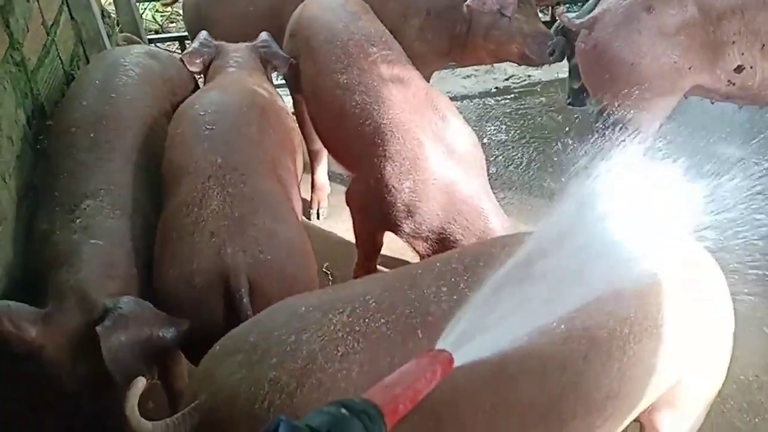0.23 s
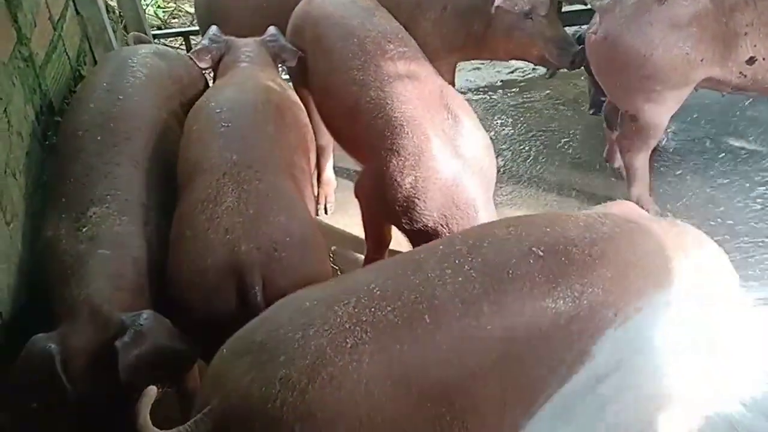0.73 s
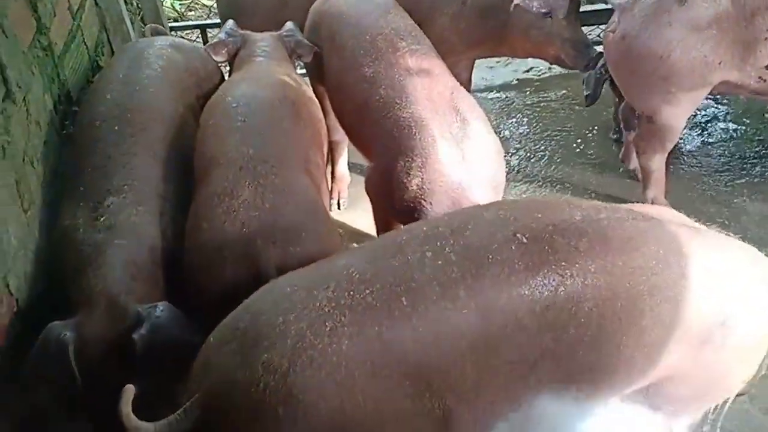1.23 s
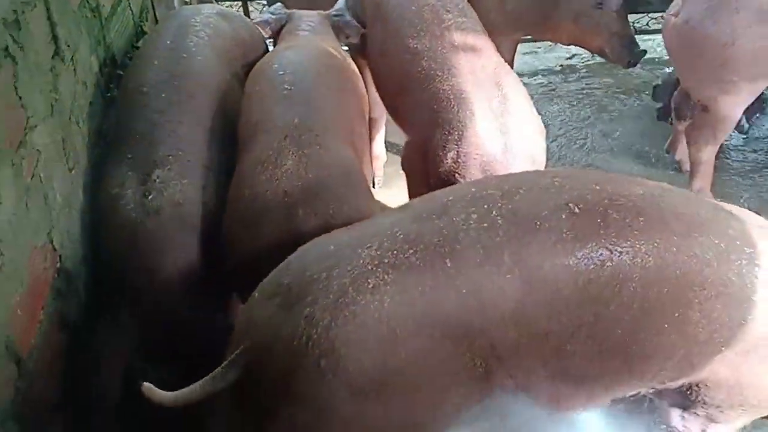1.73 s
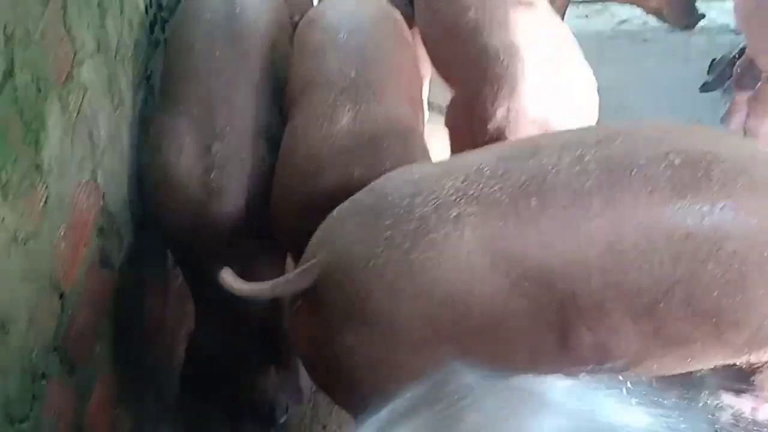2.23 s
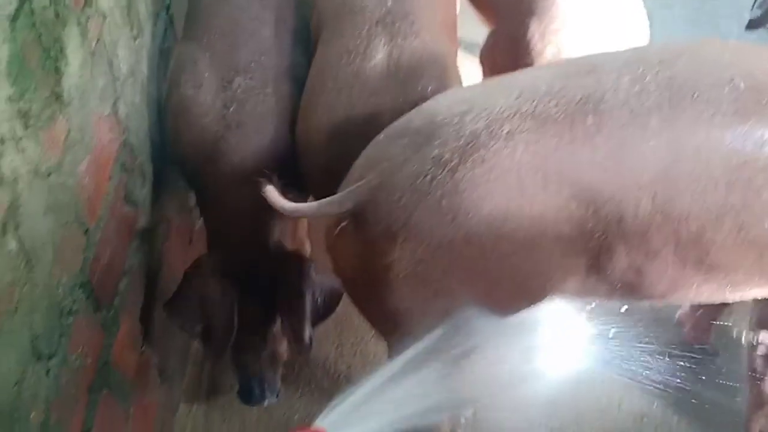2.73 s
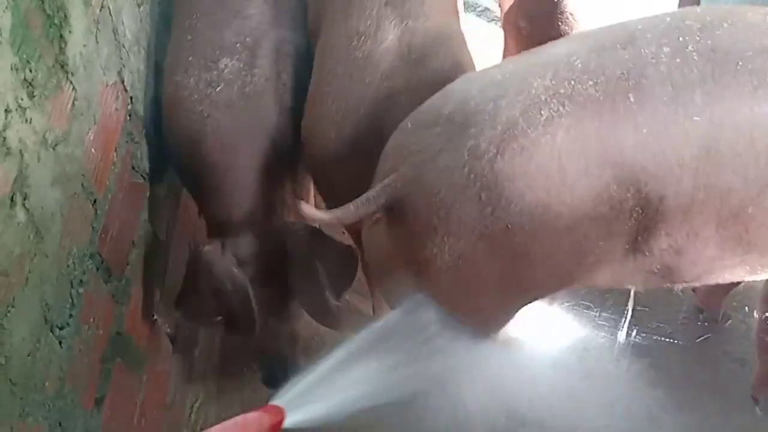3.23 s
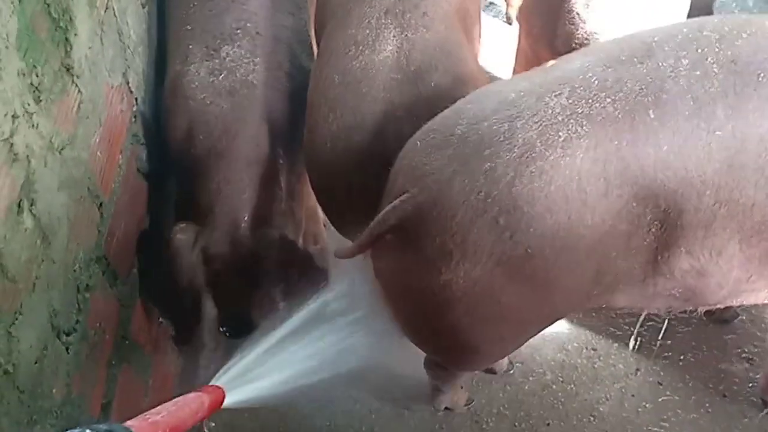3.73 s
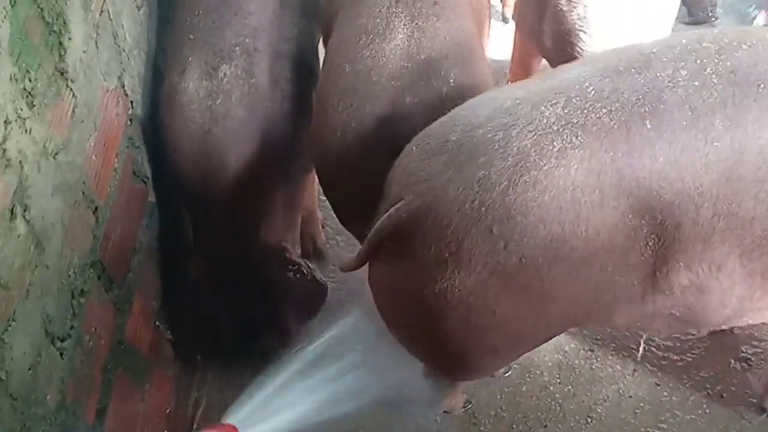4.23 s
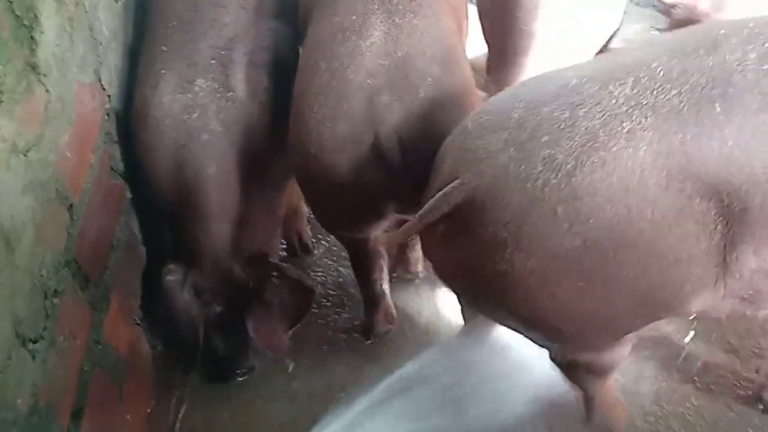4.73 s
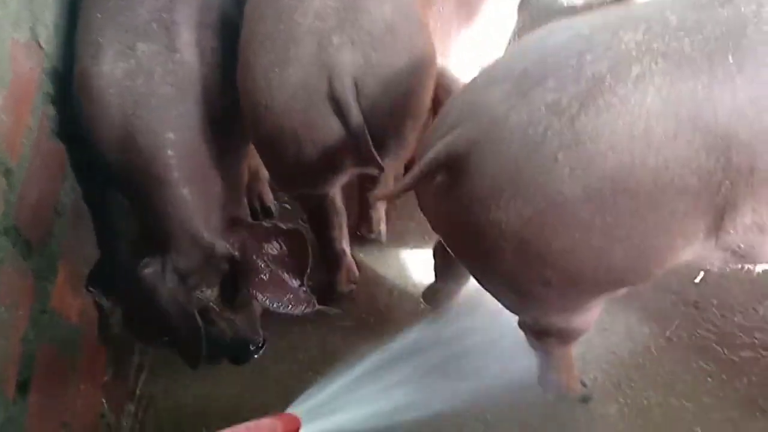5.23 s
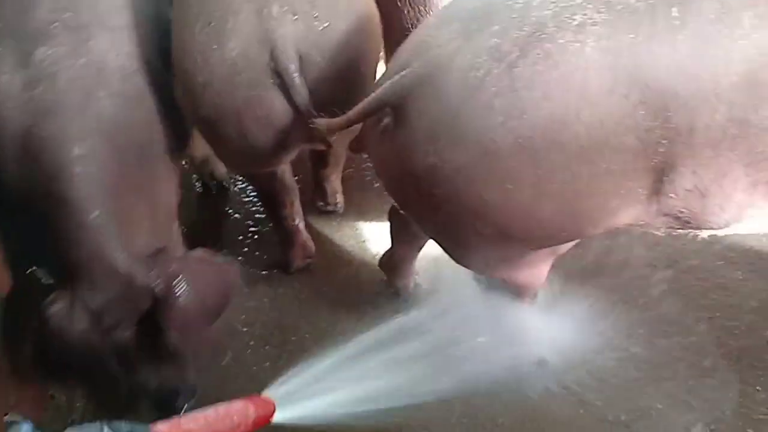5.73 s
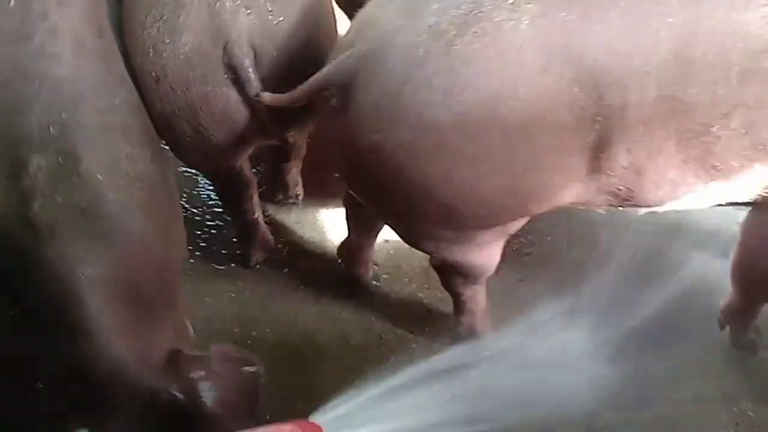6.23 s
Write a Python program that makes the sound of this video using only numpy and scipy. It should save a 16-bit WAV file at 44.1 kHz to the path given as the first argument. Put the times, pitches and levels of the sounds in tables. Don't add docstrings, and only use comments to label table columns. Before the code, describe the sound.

A hose sprays pigs in a walled pen, heard very close on a small handheld microphone. Continuous bright hiss and spatter mix with hollow drumming on bodies. Big drops smack the microphone on one side, and soft hooves thud. Around three seconds the jet surges, then stutters rapidly and drops back while a low distant engine hums. Loud slaps close it.

```python
import sys
import numpy as np
from scipy import signal
from scipy.fft import rfft, irfft, dct
from scipy.io import wavfile
from scipy.ndimage import uniform_filter1d

SR = 44100
rng = np.random.default_rng(int(sys.argv[2]) if len(sys.argv) > 2 else 0)


def to_linear_factor(level_db):
    exponent = np.asarray(level_db, float) / 20
    return 10 ** exponent


def generate_wav(sig):
    pcm = np.round(np.clip(np.atleast_2d(sig).T, -1, 1) * 32767).astype(np.int16)
    wavfile.write(sys.argv[1], SR, pcm)


N = 286650
HZ = np.fft.rfftfreq(N, 1 / SR) + 1

# [t/s, level/dB over usual]
JET_FORCE = [(0, -7.5), (.75, -4.5), (1.08, 2.5), (1.3, -1.5), (2.0, -1), (2.28, 1.5), (2.7, 0.5),
             (3.1, 1.5), (3.33, 9.5), (3.65, 4), (3.92, -6.5), (4.3, -2), (4.8, -0.5), (5.35, 1.5),
             (5.5, -1.5), (5.87, 0), (5.95, 3.5), (6.5, 4.5)]
# [t/s, level/dB over usual]
SWELL = [
    (0, 1),
    (.75, -.5),
    (3.0, 1.5),
    (3.55, -3.5),
    (3.9, -4),
    (4.25, -4.5),
    (4.6, -1),
    (5.3, -0.5),
    (5.5, 2),
    (6.5, 2.5),
]
# [t/s, heavy over fine splash level/dB]
DROP_SIZE = [(0, 1), (.6, 0.5), (1.05, 1.3), (1.3, 0), (2.0, .5), (2.6, -.5), (3.0, 1), (3.35, -.8),
             (3.58, 2.5), (3.75, -0.5), (3.85, -2), (4.1, 1.7), (4.45, -0.5), (4.8, 1), (5.4, 0),
             (5.85, -0.5), (6.2, 1.2), (6.5, 1)]
# [t/s, level/dB, half-width/s]
JET_SPURTS = [(.52, 0, .04), (1.18, 1, .05), (1.68, 3.5, 0.047), (1.88, 2.5, .03), (3.56, -1.5, 0.038),
              (2.88, 1.5, 0.039), (3.09, 2, .03), (3.13, -2, 0.017), (3.19, 2, 0.025), (3.45, -2.5, 0.021),
              (3.49, 3.5, 0.036), (3.67, 2, .02), (3.78, -2.5, .012), (3.8, 4.5, .012), (4.33, 0.5, .02),
              (4.4, 2, 0.027), (4.47, -1.5, .02), (4.49, 2.5, 0.014), (4.57, -3, 0.033), (4.62, 2.5, 0.021),
              (4.69, -6, .02), (4.83, -1.5, .03), (4.94, 2.5, .03), (5.12, 4, 0.012), (5.34, 1.5, 0.024),
              (5.43, 0.5, 0.017), (5.58, 2.5, 0.037), (5.7, 1, .02), (5.74, -2, 0.034), (6.15, -1, 0.016)]
# [t/s, length/s, level/dB, drum f/Hz]
BODY_DRUMMING = [(0, 0.4, 2, 200), (0.51, 0.29, 5, 418), (.78, 3, 2.5, 190), (1.85, 0.099, 1, 600),
                 (2.26, 0.05, 4, 700), (2.598, 0.1, 4, 500), (3.145, 0.63, 8, 427),
                 (3.507, 0.061, 3.5, 600), (3.764, 0.1, 4, 500), (4.303, 0.34, 5, 353),
                 (4.803, 0.092, 4, 353), (4.9, 0.073, 1.5, 1000), (5.28, 0.089, 2, 1000),
                 (5.493, 0.31, 5.5, 400), (6.107, .4, 1.5, 700)]

ZONE_EDGES = [150, 280, 450, 750, 1450, 3000, 6000]
ZONE_LEVEL = [-54, -49.5, -52.5, -47, -42.5, -26, -26.5, -30.5]
SURGE_SHARE = [0.082, 0.57, 1, 0.73, 0.93, 0.6, 0.92, 0.65]
FORCE_SHARE = [.15, 0.59, 0.44, 0.78, 0.67, 1.05, 1.01, 0.54]
SPURT_SHARE = [.05, 0.34, .4, 0.78, .9, 0.92, 0.76, .25]
SWELL_SHARE = [.5, 0.11, -0.018, -0.053, 0.13, -0.17, -0.17, 0.84]
SIZE_SHARE = [-0.099, 0, .1, .2, 0.24, .5, -.5, -0.047]
ZONE_UNREST = [2.3, 1.2, 1.4, 1.4, .9, 0.36, .4, .2]

# [f/Hz, level/dB per Hz]
PEN_COLOUR = [(25, -85.5), (50, -77), (90, -73), (140, -73), (190, -64.5), (260, -66.5), (340, -68.5),
              (430, -72.5), (540, -67), (680, -65)]
# [f/Hz, level/dB per Hz]
OPEN_COLOUR = [(850, -64), (1300, -67), (1800, -57), (2000, -52.5), (2200, -46), (2450, -47.5), (2850, -52),
               (3250, -58.5), (3800, -56), (4200, -53), (4900, -52.5), (5270, -49.5), (5600, -54),
               (6100, -57), (6800, -63.5),
               (7800, -69.5), (9400, -71), (9800, -75), (10300, -70.5), (11450, -68.5), (12200, -72),
               (12900, -71), (13600, -64), (14300, -69.5), (15000, -70.5), (15450, -65.5)]
# [f/Hz, level/dB per Hz]
SHADED_COLOUR = [(850, -71), (1250, -71.5), (1900, -69), (2600, -64), (3400, -70), (5000, -72),
                 (5500, -76.5), (7000, -76.5),
                 (7550, -83), (8000, -79), (8700, -80), (9200, -77), (9600, -79), (10300, -72),
                 (11300, -70), (12300, -77), (12850, -86), (13500, -77), (13900, -80), (14200, -97),
                 (15500, -104)]
# [f/Hz, ratio]
SHARED_SOUND = [(40, 0.76), (200, 0.9), (340, 0.89), (430, 0.67), (600, 0.77), (900, 0.63), (2500, 0.27),
                (5000, .2), (7000, 0.033)]
# [f/Hz, phase/rad]
OPEN_LEAD = [(40, 0), (300, .3), (800, .8), (1200, .1), (1500, 1.4), (2000, 1.2), (2500, .2), (3500, 0),
             (5500, -3.0)]

# [t/s, peak level/dB, f/Hz]
BIG_DROPS = [(0.2206, -19, 2320), (0.397, -16, 2300), (0.7996, -17, 2340), (0.9153, -7.5, 2280),
             (1.0211, -10, 2200), (1.058, -15, 2310), (2.2228, -14, 2500), (2.5416, -10, 2270),
             (3.1443, -20, 2100), (3.6713, -5.5, 2640), (3.7923, -13, 2370), (3.8372, -11.5, 2840),
             (4.0672, -25, 2190), (4.479, -12, 2300), (4.6109, -13.5, 2300), (4.7007, -11, 2370),
             (4.9245, -9, 2860), (5.1183, -13, 2070), (5.4231, -8.5, 2440), (5.7004, -8.5, 2300),
             (5.9218, -6, 2500), (6.1153, -9, 2400), (6.1483, -1.5, 2430)]
# [t/s, peak level/dB, f/Hz, t60/s]
HOOF_KNOCKS = [
    (0.746, -29.5, 181, 0.13),
    (1.041, -34, 191, 0.11),
    (1.574, -33, 167, 0.19),
    (1.702, -35, 192, 0.14),
    (2.08, -35, 127, 0.14),
    (2.473, -30.5, 168, 0.12),
    (2.865, -36, 187, 0.12),
    (5.9, -37, 186, 0.14),
    (6.154, -36, 171, 0.12),
]
# [f/Hz, level/dB over the open port]
ROUNDING_STEP = [(600, -15), (1500, -11), (2500, -15), (3500, -8), (5200, -14), (6500, -6), (7500, 0),
                 (9300, 2.5), (9900, 10), (10600, 7), (11350, 3), (12100, 6), (12700, 0), (13600, -5)]


def water(surge_db, patchy_db):
    spectra = at_ports()
    zones = np.zeros((8, 2, N))
    surge = drift(19) + 0.74 * drift(51)
    third = 3 * np.log2(HZ)
    for centre in range(13, 44):
        window = np.cos(np.pi / 2 * np.clip(third - centre, -1, 1)) ** 2
        zone = np.searchsorted(ZONE_EDGES, 2 ** (centre / 3))
        gain = to_linear_factor(surge_db * SURGE_SHARE[zone] * surge + patchy_db * drift(9.2))
        zones[zone] += gain * irfft(spectra * window, N)
    levels_db, shade_db = jet_levels()
    zones = np.array([to_linear_factor(db) * z / z.mean(axis=0).std() for db, z in zip(levels_db, zones)])
    zones[5:7, 1] *= to_linear_factor(shade_db)
    return zones.sum(axis=0)


def jet_levels():
    t = np.arange(0, N + 64, 64) / SR
    force, swell, size = [np.interp(t, *np.transpose(rows)) for rows in (JET_FORCE, SWELL, DROP_SIZE)]
    spurt = sum(db * np.exp(-((t - s) / width) ** 2) for s, db, width in JET_SPURTS)
    levels = np.outer(FORCE_SHARE, force) + np.outer(SPURT_SHARE, spurt) + np.c_[ZONE_LEVEL]
    levels += np.outer(SWELL_SHARE, swell) + np.outer(SIZE_SHARE, size)

    swing_in_s, swing_out_s, drum_octaves = 0.036, 0.08, 0.95
    edges = np.log2([80] + ZONE_EDGES + [15000])
    centres = (edges[1:] + edges[:-1])[:, None] / 2
    for s, length, db, hz in BODY_DRUMMING:
        arriving = (t - s) / swing_in_s + 0.5
        leaving = (s + length - t) / swing_out_s + 1
        held = np.clip(np.minimum(arriving, leaving), 0, 1)
        levels += db * held * np.exp(-((centres - np.log2(hz)) / drum_octaves) ** 2)

    shade = 0.3 * swell - 0.36 * spurt
    *levels, shade = [np.interp(np.arange(N) / SR, t, row) for row in (*levels, shade)]
    beat = chatter()
    moving = [db + share * beat + unrest_db * drift(4.0)
              for db, share, unrest_db in zip(levels, SPURT_SHARE, ZONE_UNREST)]
    return moving, shade


def chatter():
    from_s, to_s, fade_s = 3.45, 3.93, 0.08
    beat_s, per_s, depth_db = 3.721, 70, 7
    t = np.arange(N) / SR
    depth = np.clip(np.minimum(t - from_s, to_s - t) / fade_s, 0, 1)
    cycle = ((t - beat_s) * per_s + 0.12 * drift(12)) % 1
    return depth_db * depth * uniform_filter1d(0.4 - cycle, size=60)


def at_ports():
    grainy = 1 / np.sqrt(1 + (HZ / 4500) ** 4)
    both, *own = [splash_and_mist(grainy) for port in range(3)]
    alike = np.clip(at_hz(SHARED_SOUND), 0, 1)
    lag = np.exp(-1j * at_hz(OPEN_LEAD) * np.array([[0], [1]]))
    wall_s, wall_gain, wall_cut_hz = 0.00595, 0.17, 2800
    echo = wall_gain / (1 + (HZ / wall_cut_hz) ** 2) * np.exp(-2j * np.pi * HZ * wall_s)
    flutter = 1 / (1 - echo)
    facing = at_hz(PEN_COLOUR + OPEN_COLOUR)
    shaded = at_hz(PEN_COLOUR + SHADED_COLOUR)
    colour = causal(facing) * to_linear_factor([0 * facing, shaded - facing])
    return flutter * colour * (np.sqrt(alike) * both * lag + np.sqrt(1 - alike) * np.array(own))


def splash_and_mist(grainy):
    splash = rfft(drops(per_s=2500, spread_db=3.5, smooth=0.59))
    mist = rfft(rng.standard_normal(N))
    return grainy * splash + np.sqrt(1 - grainy ** 2) * mist


def drops(per_s, spread_db, smooth):
    sizes = to_linear_factor(spread_db * np.minimum(rng.exponential(1, N), 5)) * rng.choice([-1, 1], N)
    born = rng.random(N) < per_s / SR
    return np.sqrt(1 - smooth) * rms_one(sizes * born) + np.sqrt(smooth) * rng.standard_normal(N)


def causal(db):
    cepstrum = irfft(db * np.log(10) / 20, N)
    cepstrum[1:N // 2] *= 2
    cepstrum[N // 2 + 1:] = 0
    return np.exp(rfft(cepstrum))


def at_hz(points):
    hz, value = np.transpose(points)
    return np.interp(np.log(HZ), np.log(hz), value)


def drift(rate):
    r = np.exp(-80 * np.pi * rate / SR)
    slow = signal.lfilter([1], [1, -2 * r, r * r], rng.standard_normal(N // 40 + 2002))[2000:]
    return np.interp(np.arange(N) / 40, np.arange(len(slow)), rms_one(slow))


def rms_one(x):
    return x / np.sqrt(np.mean(x ** 2) + 1e-20)


def drop_slaps():
    rings = [(s, db, hz, 22 / hz) for s, db, hz in BIG_DROPS]
    return struck(rings, [[6], [-9]], trim_db=1, rise_cycles=0.6)


def hoof_knocks():
    return struck(HOOF_KNOCKS, [[0], [0.3]], trim_db=5.0, rise_cycles=1.4)


def struck(events, sides_db, trim_db, rise_cycles):
    out = np.zeros(N + SR)
    t = np.arange(SR // 3) / SR
    for s, db, hz, t60 in events:
        rise = 1 - np.exp(-t * hz / rise_cycles)
        shape = rise * to_linear_factor(-60 * t / t60) * np.sin(2 * np.pi * hz * t)
        out[round(s * SR):][:len(t)] += to_linear_factor(db + trim_db) * shape
    return out[:N] * to_linear_factor(sides_db)


def engine():
    start_s, start_hz, full_hz, run_up_s = 3.2, 42.7, 56.8, 0.4
    level_db, load_s, load_db, load_rise_s = -59, 5.25, 5.5, 0.08
    t = np.arange(N) / SR
    since = np.maximum(t - start_s, 0)
    hz = full_hz - (full_hz - start_hz) * np.exp(-since / run_up_s)
    db = level_db + load_db * np.clip((t - load_s) / load_rise_s, 0, 1)
    tone = np.sqrt(2) * np.sin(2 * np.pi * np.cumsum(hz + 1.5 * drift(4)) / SR)
    fade_in = np.clip(since / 0.15, 0, 1)
    return fade_in * to_linear_factor(db + 2.1 * drift(6.6)) * tone * to_linear_factor([[-0.9], [0.9]])


def scene():
    return water(surge_db=0.54, patchy_db=0.81) + drop_slaps() + hoof_knocks() + engine()


def coarsely_rounded(x, size=1024, first=396):
    padded = np.pad(x, ((0, 0), (2 * size - first, 3 * size)))
    starts = np.arange(0, padded.shape[1] - 2 * size, size)
    window = np.sin(np.pi * (np.arange(2 * size) + 0.5) / (2 * size))
    frames = padded[:, starts[:, None] + np.arange(2 * size)] * window
    a, b, c, d = np.split(frames, 4, axis=-1)
    folded = np.concatenate([-c[..., ::-1] - d, a - b[..., ::-1]], axis=-1)
    parts = dct(folded, type=4, norm="ortho")

    power = uniform_filter1d(parts[0] ** 2, size=24, axis=1)
    level = np.sqrt(uniform_filter1d(power, size=21, axis=0)) + 1e-9
    hz, db = np.transpose(ROUNDING_STEP)
    wander = uniform_filter1d(rng.standard_normal((len(starts), size // 16)), size=3, axis=0)
    wander_db = np.repeat(6 * wander, 16, axis=1)
    step = level * to_linear_factor(np.interp(np.arange(size) * SR / 2 / size, hz, db, right=1.5) + wander_db)
    rounded = np.round(parts / step) * step

    tail, head = np.split(dct(rounded, type=4, norm="ortho"), 2, axis=-1)
    frames = np.concatenate([head, -head[..., ::-1], -tail[..., ::-1], -tail], axis=-1) * window
    out = np.zeros_like(padded)
    for i, start in enumerate(starts):
        out[:, start:start + 2 * size] += frames[:, i]
    return out[:, 2 * size - first:][:, :N]


def top_cut(x):
    return signal.sosfilt(signal.butter(12, 15520, fs=SR, output="sos"), x)


def record(dry):
    overloaded = np.clip(dry, -1, 1)
    mix = coarsely_rounded(overloaded)
    return top_cut(mix)


dry = scene()
out = record(dry)
generate_wav(out)
```